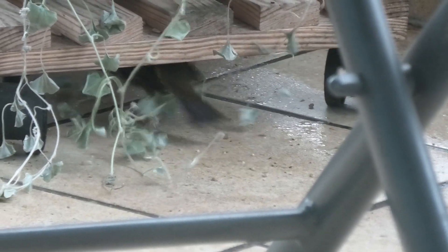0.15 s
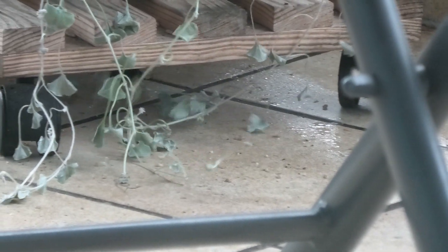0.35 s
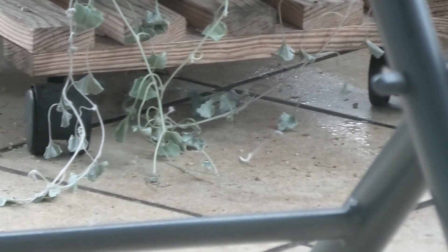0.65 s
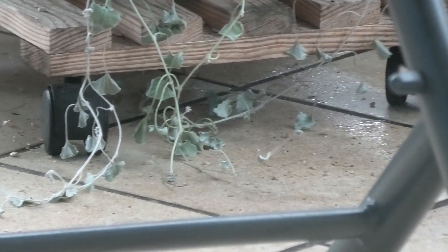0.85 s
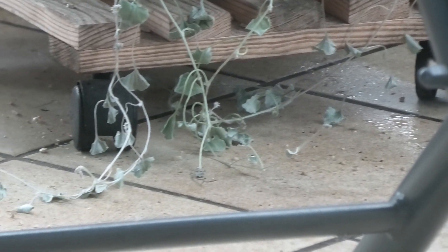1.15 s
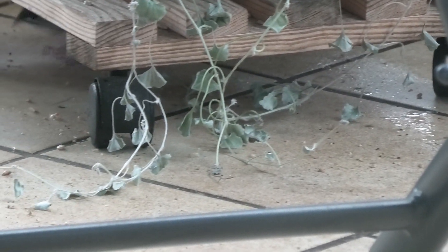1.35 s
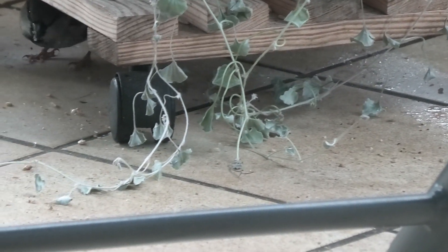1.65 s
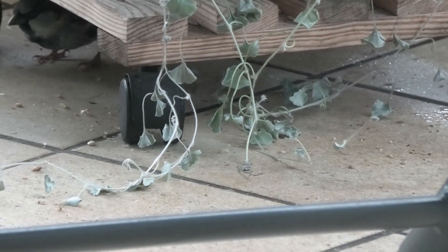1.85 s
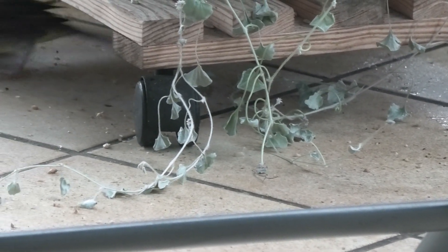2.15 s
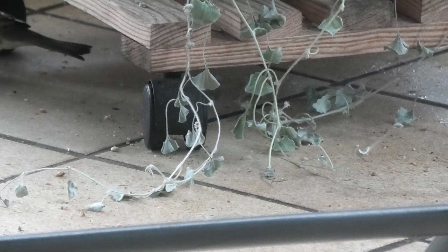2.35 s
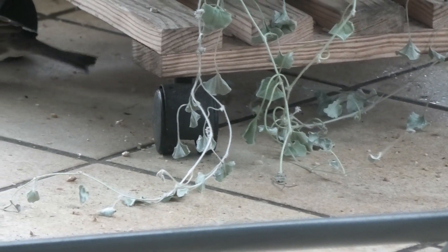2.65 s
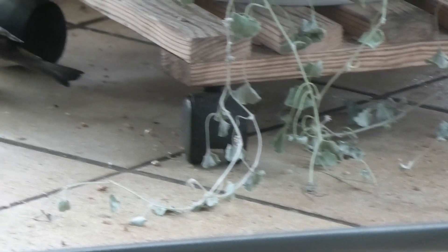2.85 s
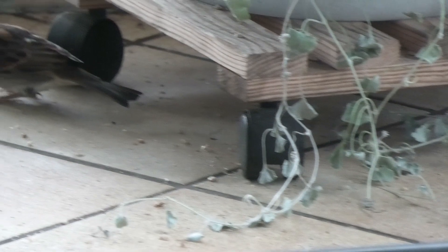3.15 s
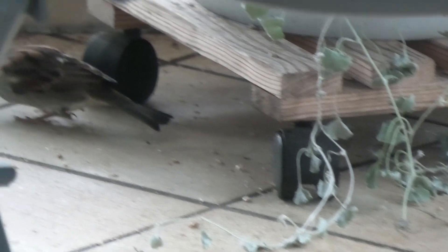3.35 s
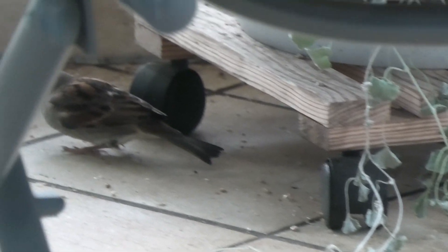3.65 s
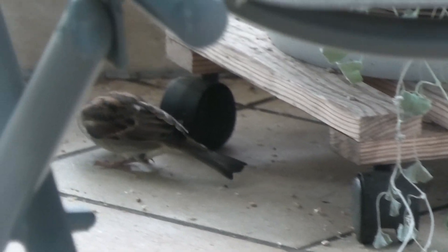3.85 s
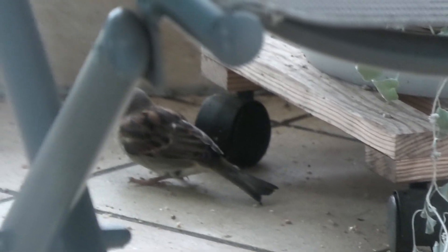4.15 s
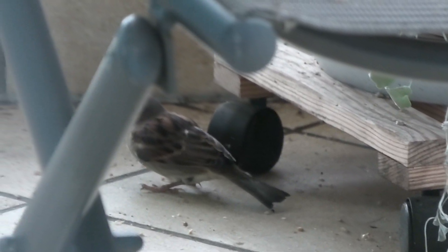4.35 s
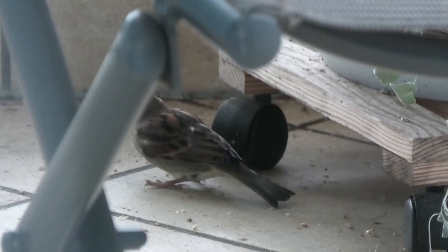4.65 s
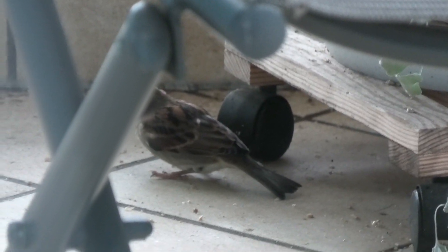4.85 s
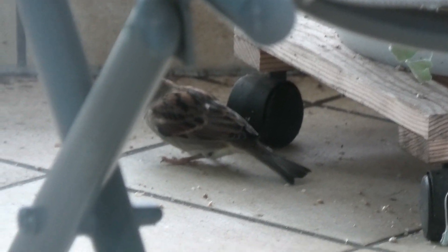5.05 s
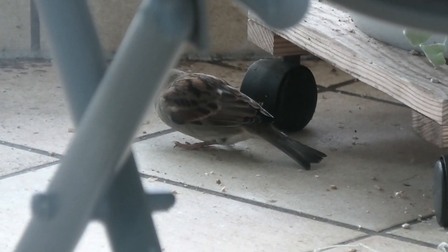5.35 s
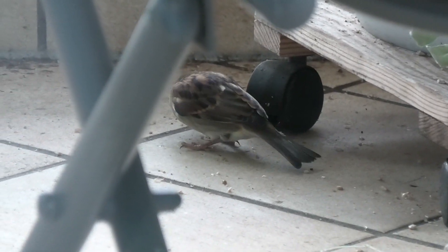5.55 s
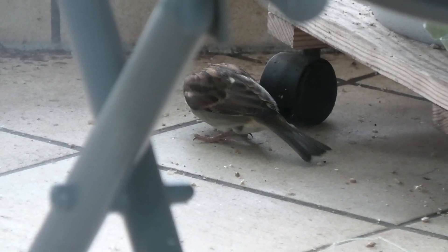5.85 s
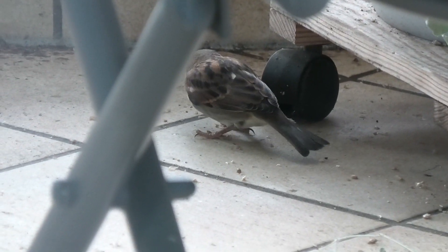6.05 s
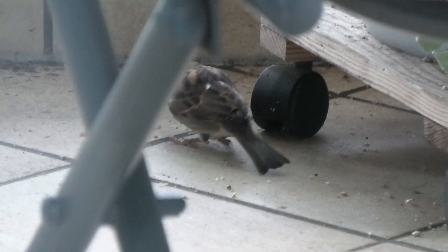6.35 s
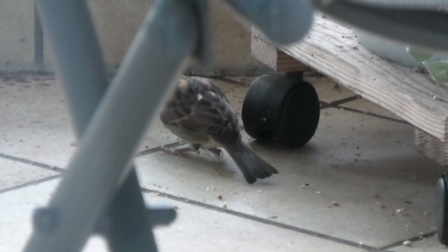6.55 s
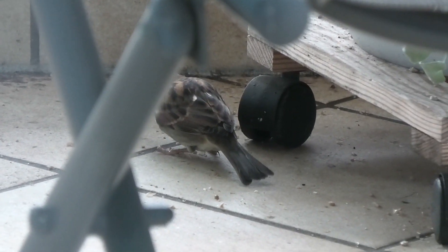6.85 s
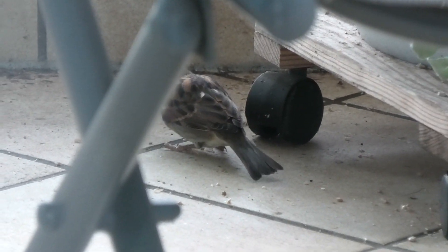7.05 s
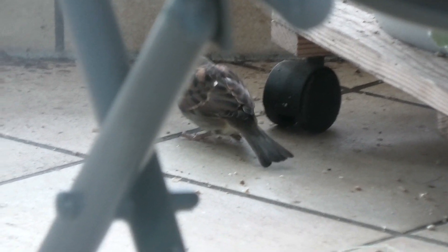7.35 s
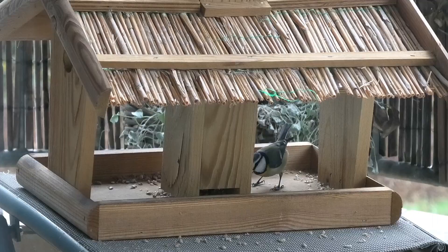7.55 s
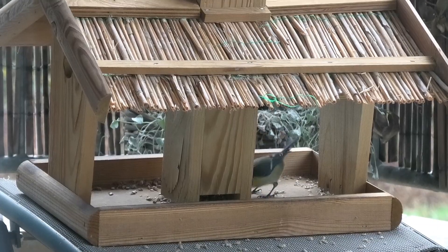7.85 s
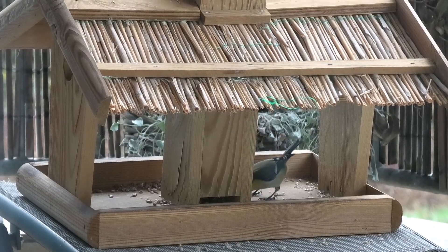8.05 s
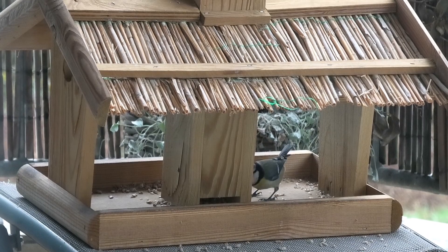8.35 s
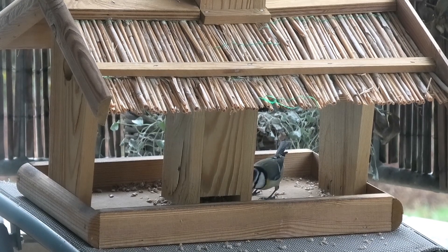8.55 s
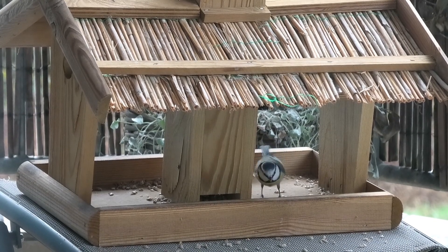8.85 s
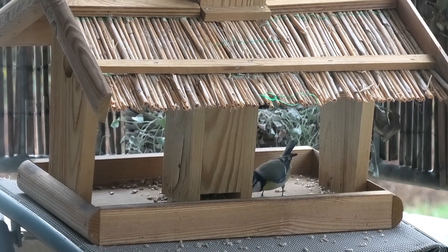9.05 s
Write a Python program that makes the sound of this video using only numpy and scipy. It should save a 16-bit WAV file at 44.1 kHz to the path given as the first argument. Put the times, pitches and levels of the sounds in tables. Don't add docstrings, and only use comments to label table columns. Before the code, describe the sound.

Songbirds call from left, right and ahead, their near-pure tones smeared by walls and foliage. Early chirps and cricket rasps give way to bowed phrases, a long descending whistle and sparse distant calls. Feathers clap once, stepped notes and mellow piping follow, then a rapid trill and warbling. After a short background dip comes a quieter garden spot with thin seeps and a scratchy burst. Wide stereo, low traffic murmur.

```python
import sys
import numpy as np
from scipy import signal
from scipy.fft import rfft, irfft
from scipy.io import wavfile
from scipy.ndimage import uniform_filter1d

SR = 44100
rng = np.random.default_rng(int(sys.argv[2]) if len(sys.argv) > 2 else 0)


def convert_level_to_amplitude(level_db):
    exponent = np.asarray(level_db, float) / 20
    return 10 ** exponent


def persist_wave(psi):
    counts = np.round(np.clip(psi, -1, 1) * 32767).astype(np.int16)
    wavfile.write(sys.argv[1], SR, np.atleast_2d(counts).T)


N = 405279


def repeated_phrases():
    # t/ms after start, f/Hz, level/dB
    arch = [
        [(0, 2350, 1), (14.4, 1900, -9), (30.09, 2670, 7), (44.55, 3200, 7), (61, 3040, -3.5)],
        [(69, 3300, -3.5), (76.6, 2300, 3.5), (89, 1850, -11.5)],
    ]
    tick = [
        [(0, 2970, -1.5), (12.2, 3110, -3.5), (17.9, 2510, 6.5), (28, 2800, -12)],
    ]
    bow = [
        [(0, 2150, -14), (3.5, 2500, 0), (7, 2850, -12)],
        [(10, 2050, -12), (14, 2600, 4), (18, 3100, -10)],
        [(20, 2400, -10), (23.5, 2650, 5), (27, 2900, -8)],
        [(28, 2650, -2), (39, 3010, 0), (55, 3110, 1), (67, 2880, -2), (73, 2550, 4), (85, 1950, -10)],
    ]
    step = [
        [(0, 3530, -4), (12, 3500, 6), (20, 3470, 3), (27, 3420, -10)],
        [(29.4, 3470, 8), (41.9, 3120, 4.5), (47.4, 2130, 4), (54.7, 2410, 3.5), (69.4, 2440, 1)],
    ]
    trill = [
        [(0, 2500, -10), (9, 3350, -7)],
        [(9.5, 4050, 0), (13, 3650, 5), (22, 3500, -10)],
        [(20, 2750, 4), (26, 2350, 5), (35, 1930, -3)],
    ]
    chuck = [
        [(0, 2950, -8), (5, 2270, 9.5), (13, 1870, -3.5)],
        [(29.5, 2700, -8), (33.4, 2250, 3), (38, 1750, -6)],
    ]
    warble = [
        [(2, 2750, -8), (14, 2850, -7)],
        [(22, 2930, -5), (37, 3000, -5)],
        [(46, 3350, -6), (52, 3100, -1), (62, 2900, -5)],
        [(67, 3250, -7), (77, 2950, -6)],
        [(82, 3000, -12), (100, 2950, -14)],
        [(112.3, 2200, -3), (136, 2720, -5), (141, 2060, 2.5), (157.2, 2600, 2.5), (164, 2260, 3.5),
         (199.7, 2200, 2)],
    ]
    whip = [
        [(0, 3100, -6), (4, 6400, 2), (7, 8700, 3), (11, 9100, 2)],
        [(12, 9000, 2), (16, 8500, 2), (23, 6700, 0), (30, 5600, 1), (40, 4800, -5)],
    ]
    glide = [
        [(0, 9250, -8), (69, 8550, -0.5), (138.7, 8150, 4.5), (311.6, 7200, -2), (446, 6600, -6.5),
         (622, 6200, -22)],
    ]
    swirl = [
        [(0, 4700, -6), (15, 5100, 0), (25, 4900, -2), (42, 3750, 0), (90, 3750, 0), (100, 4200, -2)],
        [(170, 3450, -3), (185, 3700, 0), (205, 3450, 0), (222, 3600, 1), (233, 4200, 2), (265, 4000, 0)],
        [(272, 4000, 0), (290, 4150, 4), (310, 4200, -2)],
        [(375, 4000, -1), (420, 4200, -2)],
    ]
    # t/s, level/dB
    tick_at = [(0.166, -28), (0.224, -24.5), (0.35, -23.5), (0.679, -30), (0.742, -26), (0.808, -26),
               (0.875, -25)]
    bow_at = [(1.151, -24.5), (1.272, -24.5), (1.394, -23.5), (1.761, -24), (1.894, -23), (2.025, -23.5)]
    step_at = [(3.921, -30.5), (4.054, -25), (4.203, -27.5), (4.364, -25.5), (4.509, -25), (4.697, -26.5)]
    warble_at = [(6.317, -21.5), (6.568, -22), (6.842, -23.5), (7.128, -21.5), (7.467, -23.5)]
    glide_at = [(2.11, -19.5)]
    swirl_at = [(3.79, -36)]
    arch_at = dict(start_s=.0265, every_s=.2058, db=-24, count=8)
    trill_at = dict(start_s=5.9335, every_s=.08735, db=-25, swell_db=0.16, count=12)
    chuck_at = dict(start_s=8.767, every_s=.175, db=-28.5, count=3)
    whip_at = dict(start_s=8.6935, every_s=.1745, db=-29, count=3)
    figures = dict(arch=(arch, series(**arch_at)), tick=(tick, tick_at), bow=(bow, bow_at),
                   step=(step, step_at), trill=(trill, series(**trill_at)), glide=(glide, glide_at),
                   warble=(warble, warble_at), whip=(whip, series(**whip_at)),
                   chuck=(chuck, series(**chuck_at)), swirl=(swirl, swirl_at))
    return {name: list(syllables(*figure)) for name, figure in figures.items()}


def single_notes():
    # t/s, length/s, middle f/Hz, slide from start to end/Hz, level/dB
    flute_arched = [(5.125, 0.055, 1996, 110, -32), (5.403, 0.078, 2165, -39, -17),
                    (5.562, 0.014, 2090, -430, -27), (5.591, 0.025, 2150, 353, -26.5),
                    (5.778, 0.037, 1864, -270, -29.5), (5.819, 0.1, 2061, 38, -15),
                    (5.922, .076, 2077, 28, -15), (6.2, 0.13, 2034, -42, -17.5),
                    (6.4, 0.045, 2490, -20, -15), (5.679, .042, 2640, -220, -15)]
    flute_sagging = [(5.18, .04, 2227, -850, -19.5), (5.353, .014, 2250, -50, -21),
                     (5.379, .017, 2230, 0, -18), (6.062, 0.078, 1705, -300, -23)]
    purr = [(5.539, 0.14, 2833, -150, -20), (5.72, 0.025, 2470, -50, -23), (6.445, .069, 2170, 0, -21),
            (6.543, .075, 2080, -230, -18)]
    whistle = [(4.02, .03, 2350, 160, -36), (4.84, .062, 4350, -1000, -48), (5.63, .042, 4330, -820, -40.5),
               (5.69, 0.074, 4100, -1600, -45.5), (6.66, 0.12, 4800, 20, -46.5),
               (7.18, 0.36, 3700, -290, -46.5), (8.574, .021, 2800, -1600, -17.5),
               (8.591, .03, 1980, -150, -31)]
    hook = [(4.899, 0.057, 3820, 68, -33.5), (5.42, 0.047, 3150, -560, -29),
            (5.46, .031, 3350, 1130, -18.5), (6.995, .05, 5570, -1780, -25.5)]
    far = [(2.36, .21, 2120, -220, -47), (2.7, 0.12, 2333, -190, -41), (3.095, .19, 1985, 60, -48.5),
           (3.29, .07, 2484, -88, -49), (3.33, 0.059, 2235, -190, -41.5), (3.6, 0.076, 1905, 13, -44.5),
           (3.7, .2, 2050, 38, -46)]
    buzz = [(0, 0.045, 4484, -280, -30), (.86, .24, 8250, -150, -48.5), (1.22, .03, 5700, 250, -37),
            (1.25, 0.072, 5850, -60, -25), (1.31, 0.1, 6490, -490, -37.5), (1.42, .15, 6246, -140, -31),
            (1.52, 0.15, 5275, -100, -23), (1.69, .27, 5306, -140, -41.5), (1.7, 0.22, 5818, 111, -34),
            (1.75, .33, 7170, 10, -54), (4.14, .055, 4800, -100, -46), (4.18, .25, 4480, -200, -46)]
    glide_upper = [
        (2.43, 0.082, 7450, -620, -25),
        (2.51, .21, 7720, -490, -55),
    ]
    chatter = [(2.665, 0.16, 3770, 53, -40.5), (2.8, 0.25, 3650, -50, -41.5), (3.05, 0.2, 3620, -140, -45),
               (3.25, .1, 3600, 0, -52), (5.085, 0.24, 4030, 42, -40.5)]
    twitter = [(3.345, 0.1, 7670, 378, -45), (3.45, 0.11, 7780, 653, -46), (3.55, 0.051, 8350, -120, -42.5),
               (3.65, .14, 6530, -1600, -40), (4.52, .62, 7000, -200, -51), (5.12, .33, 6400, 300, -50),
               (5.79, .09, 7000, -300, -43)]
    scratch = [(8.458, .024, 3280, 300, -44), (8.485, .008, 3200, 0, -47), (8.496, .014, 3900, 450, -45),
               (8.511, .009, 3250, 0, -43), (8.562, .014, 4150, 1700, -33), (8.638, .017, 3450, 150, -26),
               (8.654, .012, 3950, -700, -30), (8.664, .017, 3500, -150, -28), (8.68, .011, 4500, 100, -36),
               (8.689, .018, 3550, 800, -28), (8.713, .028, 3600, -100, -31),
               (8.754, .012, 3600, 1200, -25), (8.765, .016, 3650, -600, -22),
               (8.782, .018, 4300, 100, -31), (8.799, .014, 3750, 800, -25), (8.817, .011, 3800, -100, -31),
               (8.832, .014, 3750, -500, -30), (8.857, .011, 4000, 100, -29), (8.886, .02, 4000, 50, -31),
               (8.907, .011, 3450, 50, -34), (8.916, .011, 4150, 0, -33), (8.933, .033, 4050, 120, -31),
               (8.972, .009, 4100, -200, -33), (8.99, .008, 4000, 0, -37), (9.002, .022, 4020, 50, -31),
               (9.038, .012, 4000, 0, -35)]
    chip = [
        (6.75, 0.024, 6330, -1120, -32),
        (6.812, 0.022, 6400, -860, -30),
        (6.875, .027, 6380, -620, -33.5),
    ]
    squeal = [
        (2.785, 0.0096, 4660, -1, -31),
        (7.05, 0.026, 4300, 800, -22),
        (7.071, 0.07, 4320, -1050, -21),
    ]
    cry = [
        (6.976, .08, 2920, 880, -34.5),
    ]
    scold = [
        (1.652, .045, 1440, -40, -54),
    ]
    coo = [
        (2.79, 0.084, 1065, -48, -40),
        (2.98, .17, 890, -57, -42.5),
        (3.33, .19, 580, -111, -39),
    ]
    bend = dict(arched=.03, sagging=-0.0436, hooked=-.07, peaked=0.091, pointed=0.22)
    calls = [("purr", purr, None), ("whistle", whistle, None), ("far", far, None), ("buzz", buzz, None),
             ("glide", glide_upper, None), ("chatter", chatter, None), ("twitter", twitter, None),
             ("scratch", scratch, None), ("pipe", flute_arched, "arched"),
             ("pipe", flute_sagging, "sagging"), ("whistle", hook, "hooked"), ("chip", chip, "pointed"),
             ("squeal", squeal, "peaked"), ("cry", cry, "hooked"), ("scold", scold, "pointed"),
             ("coo", coo, "arched")]
    return [(name, list(sliding_notes(tune, bend.get(shape, 0)))) for name, tune, shape in calls]


def seeps():
    # t/s, length/s, top f/Hz, place of the top [share of length], level/dB
    thin_arches = [
        (7.695, 0.064, 7950, .72, -45.5),
        (7.83, .128, 8200, .56, -45),
        (7.998, .145, 8360, .38, -46),
        (8.192, 0.16, 7510, .32, -43),
    ]
    leap_s = .014
    for s, length, top_hz, top_at, db in thin_arches:
        t = np.arange(int(length * SR)) / SR
        hz = np.interp(t, [0, leap_s, top_at * length, length - leap_s, length],
                       [5500, .91 * top_hz, top_hz, .88 * top_hz, 6350])
        hz = uniform_filter1d(hz, size=150, mode="nearest")
        yield s, hz, convert_level_to_amplitude(db) * signal.windows.tukey(len(t), .15)


def ripple():
    start_s, length_s, every_s, crest_s = 5.287, .125, .0243, 5.303
    t = np.arange(int(length_s * SR)) / SR
    turn = 2 * np.pi * (t + start_s - crest_s) / every_s
    hz = 2560 - 100 * t / length_s + 170 * np.cos(turn)
    dip = 1 - .5 * np.sin(turn / 2 + .8) ** 4
    return [(start_s, hz, convert_level_to_amplitude(-19) * dip * signal.windows.tukey(len(t), .3))]


def series(start_s, every_s, db, count, swell_db=0):
    return [(start_s + k * every_s, db + k * swell_db) for k in range(count)]


def syllables(shape, deliveries):
    detune = 1 + 0.0069 * rng.standard_normal(len(deliveries))
    for (s, db), k in zip(deliveries, detune):
        for stroke in shape:
            ms, hz, rel_db = np.transpose(stroke)
            t = np.arange(ms[0], ms[-1], 1000 / SR)
            slide = uniform_filter1d(np.interp(t, ms, hz), size=70, mode="nearest")
            gain = convert_level_to_amplitude(db + np.interp(t, ms, rel_db)) * signal.windows.tukey(len(t), .25)
            yield s + ms[0] / 1000, k * slide, gain


def sliding_notes(table, bend, edge_s=0.0064):
    for s, length, hz, slide_hz, db in table:
        u = np.linspace(-1, 1, int(length * SR))
        fade = np.clip((1 - np.abs(u)) * length / 2 / edge_s, 0, 1)
        yield s, hz * (1 - bend * u ** 2) + slide_hz * u / 2, convert_level_to_amplitude(db) * np.sin(np.pi / 2 * fade)


def voice(name):
    # perch, pitch wobble/Hz, near echo/dB, far echo/dB
    voices = dict( arch=("right", 23, -7.5, -20.5), tick=("ahead", 54, -7, -18),
              bow=("ahead", 18, -11, -14), step=("ahead", 26, -9.5, -14.5),
              trill=("right", 42, -8.5, -11.5), warble=("bush", 54.5, -8.5, -11),
              whip=("right", 24, 3.5, -10.5), chuck=("right", 33, -7.5, -24),
              glide=("fence", 60, -4.5, -9.5), pipe=("left", 10, -12, -12), ripple=("left", 20, -9, -12),
              whistle=("ahead", 34, -3, -10), far=("hedge", 14.3, -5, -3), buzz=("left", 36, -3, -7.5),
              chatter=("hedge", 200, -3, -2), twitter=("ahead", 300, 1.7, 1.5),
              scratch=("bush", 60, -8, -9), swirl=("ahead", 130, 2, -1), purr=("left", 19, -8.5, -14),
              chip=("left", 120, -9, -16), squeal=("fence", 36, -7, -9.5), cry=("fence", 31, -1, -20),
              scold=("right", 30.6, -6, -14), coo=("ahead", 85, -6, -8.5), seep=("bush", 43, -9, -9))
    perches = dict(right=-5, hedge=-2.2, ahead=0.68, bush=2.3, fence=5, left=6.5)
    overtones = dict(arch=[-44], bow=[-33, -60, -36, -30], step=[-29, -44, -39, -44, -42],
                 trill=[-23, -25, -32, -36], warble=[-40, -50, -38, -36, -38], whip=[-18.5],
                 pipe=[-34, -38, -33.5, -29, -44, -50], whistle=[-32.5], far=[-23], buzz=[-27.5],
                 ripple=[-32, -34, -23], purr=[-28, -29, -22, -46], glide=[-25], chip=[-8],
                 squeal=[-17.5, -26], cry=[2.4, -5.5, -4.5], scold=[14.7, 20.4, 22, 19, 7.4, 5.3],
                 coo=[-12.5])
    perch, wobble_hz, near_db, far_db = voices[name]
    flutter_db = min(1 + wobble_hz / 40, 4.5)
    faint_octave = [-36]
    return perches[perch], wobble_hz, flutter_db, near_db, far_db, overtones.get(name, faint_octave)


def bird(strokes, name, air):
    # rate [1/s], fall/Hz, gap depth [0-1]
    bead_styles = dict(buzz=(31, 140, .55), warble=(70, 80, .2), chatter=(46, 850, 1),
                   twitter=(60, 1500, .4), pipe=(95, 20, .1), purr=(98, 60, .75), glide=(48, 120, .6))
    # f/Hz, level/dB
    beak = [
        (4000, -5),
        (6500, 0),
        (8500, -3),
        (10500, 2),
        (12500, -5),
        (14500, 2),
    ]
    hiss_db = dict(warble=-30, purr=-29, trill=-28, step=-36, pipe=-40, chip=-25, ripple=-36)
    pan_db, wobble_hz, flutter_db, near_db, far_db, overtones_db = voice(name)
    rate, fall_hz, gap = bead_styles.get(name, (1, 0, 0))
    hiss = air * convert_level_to_amplitude(hiss_db.get(name, -60))
    wobble = wobble_hz * walk(150)
    flutter = convert_level_to_amplitude(flutter_db * walk(90))
    breath = .5 + 1.19 * walk(500)
    tempo = rate * (1 + .15 * walk(30))
    song = np.zeros(N)
    for s, hz, gain in strokes:
        now = np.minimum(int(s * SR) + np.arange(len(hz)), N - 1)
        bead = np.cumsum(tempo[now]) / SR % 1
        phase = 2 * np.pi * np.cumsum(hz + wobble[now] + fall_hz * (.5 - bead)) / SR
        upper = 0
        for k, db in enumerate(overtones_db, 2):
            level = convert_level_to_amplitude(db + np.interp(k * hz, *np.transpose(beak)))
            upper = upper + level * np.sin(k * phase) * (k * hz < .45 * SR)
        pulse = 1 - np.clip(gap, 0, 1) * np.cos(np.pi * bead) ** 2
        tone = np.sin(phase) + breath[now] * upper + hiss[now]
        add(song, s, np.sqrt(2) * gain * pulse * flutter[now] * tone)
    return place(song, pan_db, near_db, far_db)


def birds():
    songs = repeated_phrases()
    songs["seep"], songs["ripple"] = list(seeps()), ripple()
    for name, strokes in single_notes():
        songs[name] = songs.get(name, []) + strokes
    air = band(rng.standard_normal(N), 8500, 12500)
    return sum(bird(strokes, name, air) for name, strokes in songs.items())


def place(x, pan_db, near_db, far_db, lag=None):
    near_t60_s, far_t60_s = .14, .81
    t = np.arange(SR // 2) / SR
    near, far = rng.standard_normal((2, 2, len(t))) * (t > .002)
    near = (near + 1.45 * near[0]) * convert_level_to_amplitude(-60 * t / near_t60_s)
    far = far * convert_level_to_amplitude(-60 * t / far_t60_s)
    echo = convert_level_to_amplitude(near_db) * near / np.sqrt(np.sum(near[1] ** 2))
    echo = echo + convert_level_to_amplitude(far_db) * far / np.sqrt(np.sum(far[0] ** 2))
    lag = 0.26 * pan_db if lag is None else lag
    echo[:, :32] = np.sinc(np.arange(32) - 16 + np.array([[lag], [-lag]]) / 2) * np.hanning(32)
    echo *= convert_level_to_amplitude(np.array([[pan_db], [-pan_db]]) / 2) / np.sqrt(1 + convert_level_to_amplitude(2 * near_db))
    return signal.oaconvolve(x[None], echo, axes=1)[:, 16:N + 16]


def walk(rate):
    k = int(SR / rate)
    steps = np.repeat(rng.standard_normal(N // k + 1), k)
    return 1.3 * uniform_filter1d(uniform_filter1d(steps, k), k)[:N]


def band(x, lo_hz, hi_hz):
    sos = signal.butter(3, [lo_hz, min(hi_hz, .45 * SR)], "band", fs=SR, output="sos")
    y = signal.sosfilt(sos, x)
    return y / y.std()


def add(track, s, x):
    i = int(max(s, 0) * SR)
    track[..., i:i + x.shape[-1]] += x[..., :N - i]


def cricket():
    rasps = dict(start_s=-0.0046, every_s=.2077, db=-26, count=8)
    out, t = np.zeros(N), np.arange(int(.062 * SR)) / SR
    for s, db in series(**rasps):
        teeth = np.sin(np.pi * (230 * t + np.cumsum(0.011 * rng.standard_normal(len(t))))) ** 2
        noise = rng.standard_normal((2, len(t)))
        lower = convert_level_to_amplitude(-13.5) * np.hanning(len(t)) * band(noise[1], 11000, 12000)
        wing = band(noise[0], 12760, 13900) + lower
        add(out, s - .004, convert_level_to_amplitude(db - 4) * teeth * wing * signal.windows.tukey(len(t), .5))
    return place(out, -6, -8, -18.5, lag=-0.92)


def wings():
    # t/s, length/s, level/dB, left minus right/dB, low share/dB
    flaps = [
        (1.659, 0.061, -46, -15, -20),
        (3.636, 0.067, -34.5, -5, 4.5),
        (5.79, .09, -44, 3, -6),
    ]
    out = np.zeros((2, N))
    for s, length, db, pan_db, low_db in flaps:
        t = np.arange(int(2 * length * SR)) / SR
        noise = rng.standard_normal((3, len(t)))
        grain = convert_level_to_amplitude(2.7 * uniform_filter1d(noise[2], size=90) * 6.1)
        flap = band(noise[0], 2700, 12800) * grain + convert_level_to_amplitude(low_db) * band(noise[1], 224, 1430)
        swell = np.minimum(t / 0.0018, 1) * np.exp(-(t / length) ** 2 * 0.7)
        add(out, s, convert_level_to_amplitude(db + np.array([[pan_db], [-pan_db]]) / 2) * flap * swell)
    return out


def ambience(spectrum, db):
    # f/Hz, likeness [0-1]
    likeness = [(60, 0.25), (130, 0.56), (290, 0.53), (640, 0.87), (1400, 0.86), (3100, 0.56),
                (15000, 0.46)]
    hz = np.maximum(np.arange(N // 2 + 1) * SR / N, 1)
    colour_hz, colour_db = np.transpose(spectrum)
    colour = convert_level_to_amplitude(np.interp(np.log(hz), np.log(colour_hz), colour_db))
    alike_hz, alike = np.transpose(likeness)
    alike = np.clip(np.interp(np.log(hz), np.log(alike_hz), alike), 0, .99)
    mid, side = rfft(rng.standard_normal((2, N))) * colour * np.sqrt([1 + alike, 1 - alike])
    out = 0
    for centre in range(4, 16, 2):
        share = np.clip(1 - np.abs(np.log2(hz) - centre) / 2, 0, 1)
        swell = convert_level_to_amplitude(walk(1.867) + walk(11) / 2)
        out = out + irfft(np.array([mid + side, mid - side]) * share, N) * swell
    return out * convert_level_to_amplitude(db) / out.mean(axis=0).std()


def background(t):
    # f/Hz, level per Hz/dB
    town = [(25, -15), (228, 0), (601, -6), (854, -3), (1000, -6), (1800, -11), (5790, -25.5), (15700, -27)]
    # f/Hz, level per Hz/dB
    garden = [(25, -11.5), (247, -2), (1280, -2), (5060, -23.5), (7180, -28), (8440, -33), (13700, -22),
              (15700, -32)]
    change_s, dip_length_s, dip_db = 7.565, 0.028, -31
    dip = np.clip(2 - 4 * np.abs(t - change_s) / dip_length_s, 0, 1)
    murmur = np.where(t < change_s, ambience(town, -41), ambience(garden, -40.5))
    rumble = signal.sosfiltfilt(signal.butter(4, 1700, fs=SR, output="sos"), murmur)
    return rumble * convert_level_to_amplitude(dip_db * dip) + (murmur - rumble) * convert_level_to_amplitude(dip_db * dip / 4)


def mains_hum(t):
    return convert_level_to_amplitude(-67) * np.sin(2 * np.pi * 50 * t)


def scene():
    t = np.arange(N) / SR
    return birds() + cricket() + wings() + background(t) + mains_hum(t)


def roll_off(x):
    return signal.sosfilt(signal.butter(12, 15840, fs=SR, output="sos"), x)


def record(dry):
    mix = np.tanh(dry / 2) * 2
    return roll_off(mix)


dry = scene()
out = record(dry)
persist_wave(out)
```